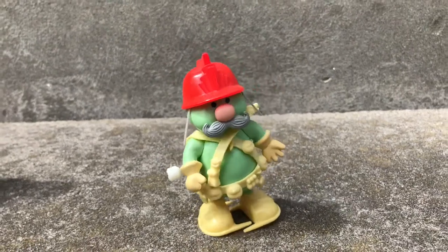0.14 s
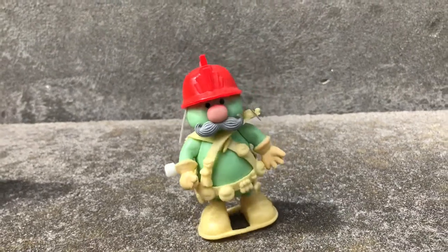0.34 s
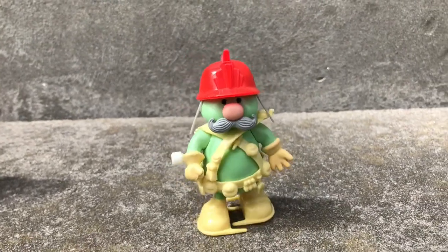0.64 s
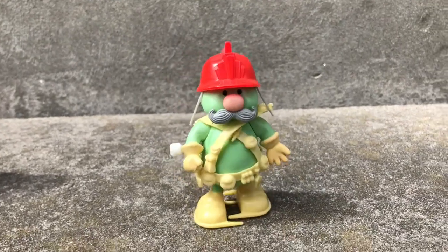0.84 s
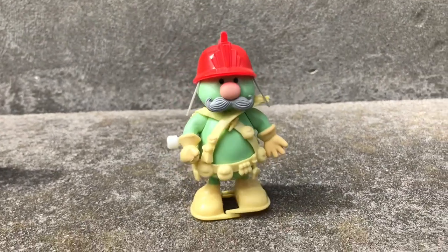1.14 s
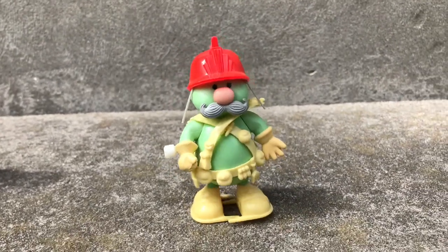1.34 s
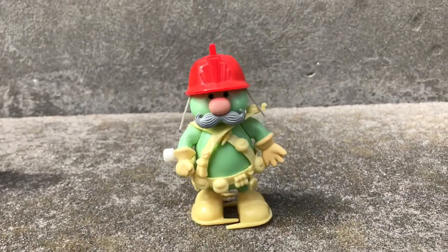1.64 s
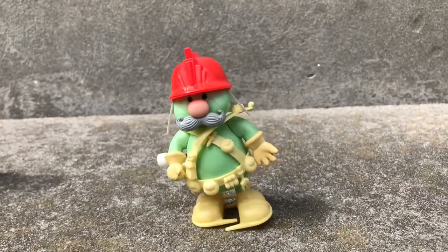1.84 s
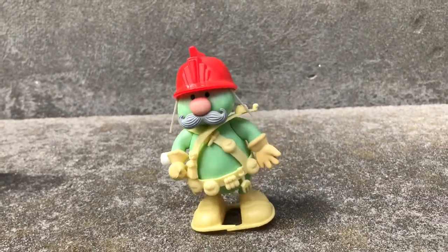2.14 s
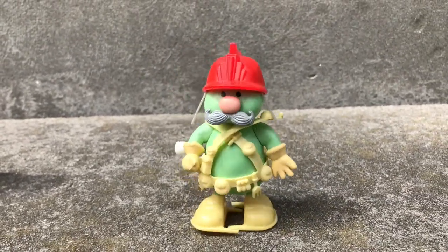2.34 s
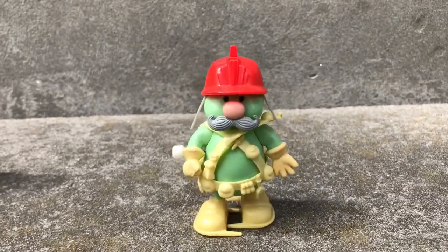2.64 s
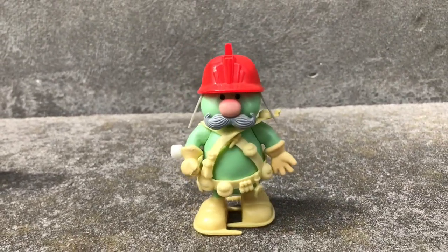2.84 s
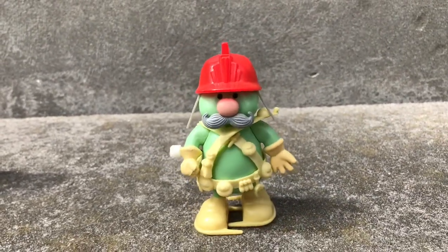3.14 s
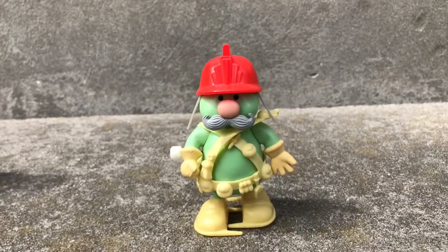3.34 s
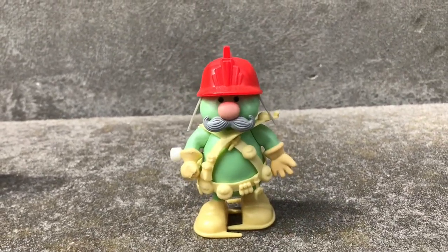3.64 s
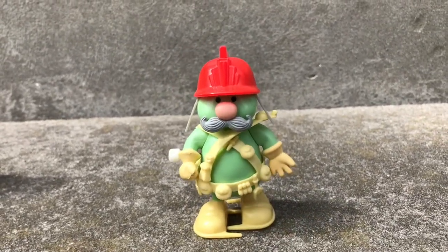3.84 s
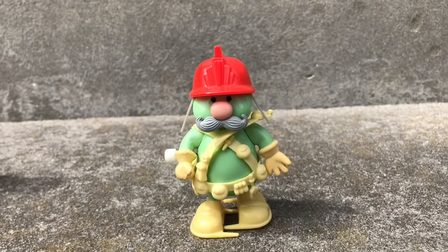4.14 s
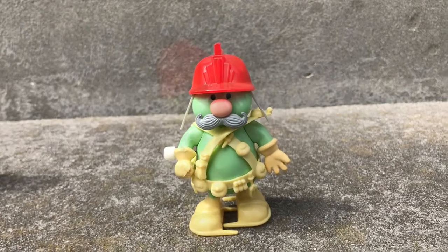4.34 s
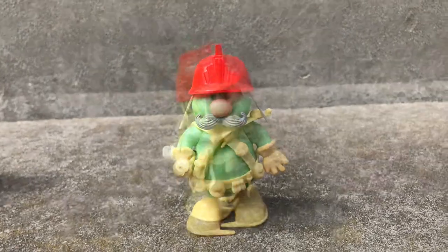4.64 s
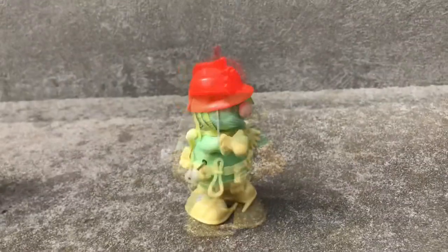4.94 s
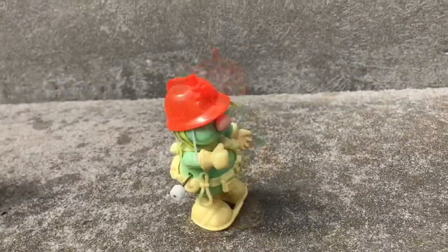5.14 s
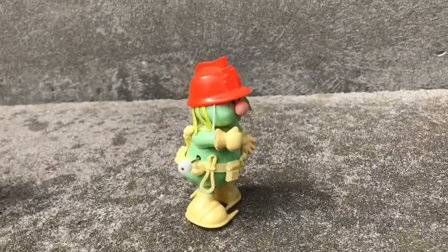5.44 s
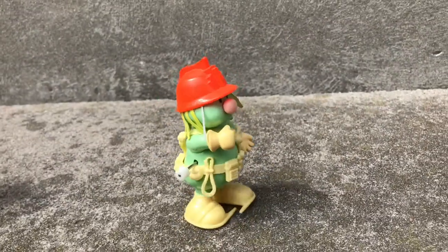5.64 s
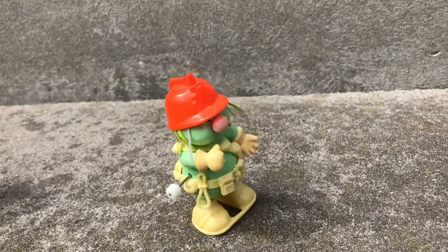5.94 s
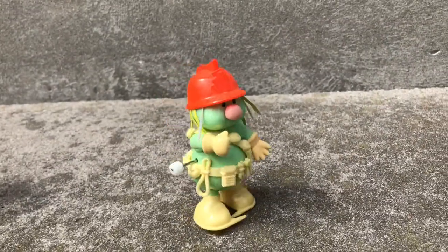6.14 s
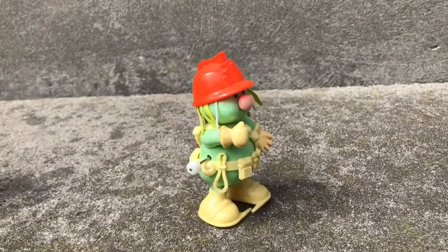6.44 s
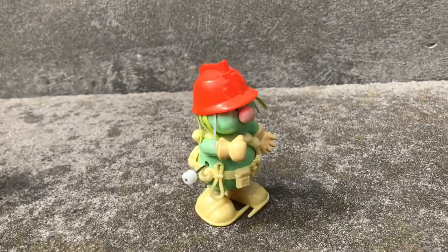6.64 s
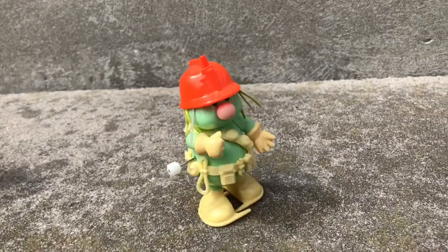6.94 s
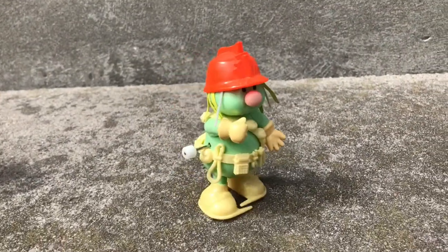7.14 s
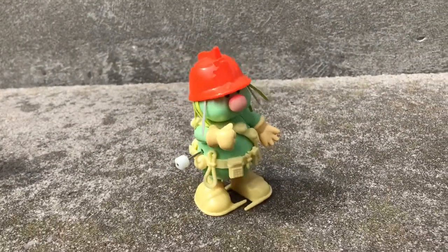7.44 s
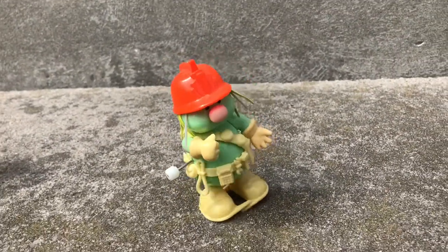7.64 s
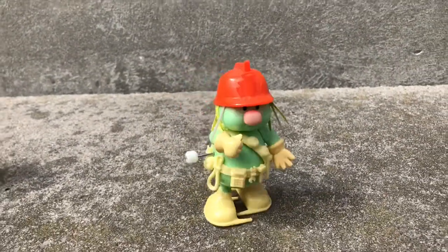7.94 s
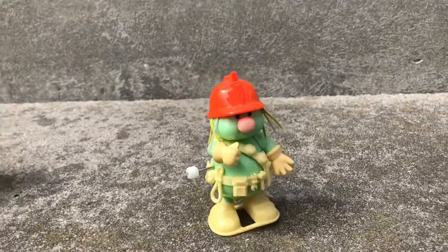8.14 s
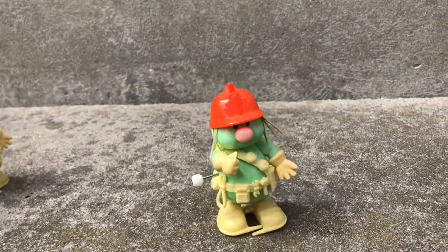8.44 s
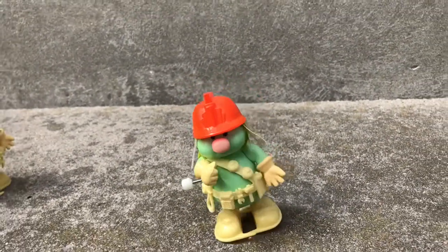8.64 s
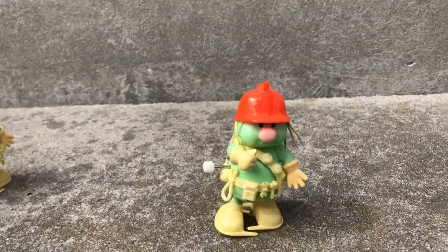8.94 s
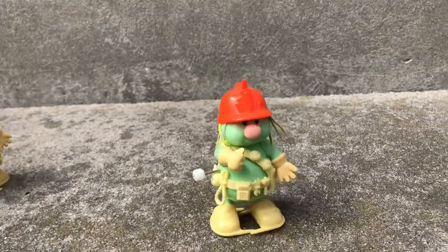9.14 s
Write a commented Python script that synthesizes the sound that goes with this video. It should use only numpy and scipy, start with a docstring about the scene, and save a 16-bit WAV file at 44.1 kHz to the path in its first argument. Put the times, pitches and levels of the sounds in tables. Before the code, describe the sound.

A small plastic wind-up toy walks on concrete outdoors, heard close up and in mono. From the start its gears give a high, ratcheting whir with a hollow rattle, labouring in short surges while the feet clack and scuff. It falters just before 1 second and again around 1.6 seconds, where the spring slips with a cluster of tiny pings. At about 2.7 seconds the mechanism stops, leaving a few very faint pings. A distant gull calls once at around 3 seconds. From about 4.3 seconds the whir fades back in, reaching a steady run just after 5 seconds. It pulses with roughly three strides a second, with sharp plastic clacks and gritty scrapes, the strongest knock near 6.8 seconds, and carries on to the end at a little over 9 seconds. A faint, low rumble of far traffic lies underneath throughout.

```python
"""The ratcheting whir of a plastic wind-up figure waddling on concrete, close up and in mono. Gear teeth tick
hundreds of times a second into its hollow shell. It labours in surges, stalls and stops; then the scene changes
and it fades in at a steady stride, side-on and slowly turning. Its feet clack and scuff, and the stalled spring
slips with tiny pings. A distant gull calls once over a town's far rumble."""
import sys
import numpy as np
from scipy import signal
from scipy.fft import rfft, irfft, next_fast_len
from scipy.io import wavfile
from scipy.ndimage import uniform_filter1d, map_coordinates

SR = 44100
rng = np.random.default_rng(int(sys.argv[2]) if len(sys.argv) > 2 else 0)


def output_pcm(signal):
    """Save a mono or channel-first signal as 16-bit PCM at the path in sys.argv[1].

    Samples are clipped to [-1, 1] before scaling.
    """
    pcm = np.clip(np.atleast_2d(signal).T, -1, 1) * 32767
    wavfile.write(sys.argv[1], SR, np.round(pcm).astype(np.int16))


N = 409248

# The gears break free, gather speed and are braked, one row per surge:
# start_s, brake_s, whir_at_brake_db, climb_db, treble_db
GEAR_SURGES = [(-.05, 0.101, -37.5, 1.5, -1.5), (.07, 0.245, -39.5, 3.5, -1),
               (.226, 0.416, -35.5, 1.5, 3.5), (0.371, .57, -39, -3, 7.5), (0.564, 0.678, -36, 4, 7.5),
               (.663, .874, -48.5, 3, 0), (0.915, .95, -61, -14, -1), (1.002, 1.158, -37.5, 12, -2),
               (1.164, 1.366, -31.5, 6, -1.3), (1.36, 1.525, -37.5, 8.5, -2), (1.531, 1.705, -68, -9, -2.5),
               (1.726, 1.94, -39.5, 6, -3.5), (1.979, 2.072, -43, -10, 3), (2.04, 2.119, -50.5, -1.5, 2.5),
               (2.105, 2.379, -40, 2, 3.5), (2.386, 2.515, -39, -1, 7), (2.541, 2.629, -49, 2.5, -1.4),
               (2.634, 2.671, -52, .5, -2.5)]
# Knocks of the feet and leg linkage: time_s, level_db, ring_hz
FOOT_KNOCKS = [(0.0956, -30.5, 4740), (0.19, -33.5, 4100), (0.2427, -33, 3950), (0.2782, -31.5, 4730),
               (0.786, -35, 3750), (1.3654, -30, 3800), (1.525, -31.5, 3660), (1.5894, -32.5, 3660),
               (1.604, -34.5, 3420), (1.9999, -34, 4400), (2.572, -35, 3870), (5.024, -36, 3900),
               (5.1641, -24, 4070), (5.3532, -33, 4150), (5.3915, -27, 4220), (5.4943, -27.5, 4670),
               (5.954, -31, 4390), (6.03, -30.5, 3253), (6.0524, -26.5, 5240), (6.2079, -30.5, 4390),
               (6.3418, -29, 4390), (6.5571, -28, 4180), (6.8421, -20.5, 4014), (7.0803, -27, 4430),
               (7.1288, -27, 4150), (7.6975, -28, 4045), (7.7239, -29.5, 4096), (8.6305, -24.5, 4380),
               (8.8601, -31, 4140), (9.0762, -28.5, 4150), (9.213, -26.5, 4050)]
WALK_START_S, WALK_FADE_S = 4.3, .95  # the steady walk fades in
CRUISE_DB = -35  # whir at cruising speed


def clockwork(jolt_cavity_db=-1):
    """The gears shake the shell into a high whir, a lower rattle and a hollow hum."""
    t = np.arange(N) / SR
    labour_db, walk_db = np.array([labouring(), walking()]) + .56 * wobble(28)
    whir, rattle = shell(gear_train(np.where(t < WALK_START_S, labour_db, walk_db)))
    cavity = below(rattle, edge_hz=3600)
    fade_in = np.clip((t - WALK_START_S) / WALK_FADE_S, 0, 1)
    whir_gain, rattle_gain, cavity_gain = np.zeros((3, N))
    gaits = (labour_db, -42, .55, -2, 1), (walk_db, -42.5, .36, -3.4, fade_in)
    for whir_db, rattle_cruise_db, swing, cavity_db, fader in gaits:
        # The rattle swings less than the whir and never tops it; the cavity follows both.
        rattle_db = np.minimum(rattle_cruise_db + swing * (whir_db - CRUISE_DB), whir_db)
        whir_gain += fader * amp(whir_db)
        rattle_gain += fader * amp(rattle_db)
        cavity_gain += fader * amp((whir_db + rattle_db) / 2 + cavity_db)
    jolt = jolts()
    walls = whir_gain * brightened(whir) + np.hypot(rattle_gain, jolt) * (rattle - cavity)
    return walls + np.hypot(cavity_gain, amp(jolt_cavity_db) * jolt) * cavity


def labouring(release_s=.0176, brake_db_per_s=540):
    """Level of the whir in dB while the weak spring moves the gears in surges."""
    t = np.arange(N) / SR
    level = np.full(N, -110.)
    for start, end, db, climb_db, _ in GEAR_SURGES:
        release = 1 - np.exp(-np.maximum(t - start, 0) / release_s)
        to_go = np.clip((end - t) / (end - start), 0, 1)
        brake_db = brake_db_per_s * np.maximum(t - end, 0)
        level = np.maximum(level, db + 20 * np.log10(release + 1e-9) - climb_db * to_go - brake_db)
    return level


def walking(last_stride_s=.29, check_s=.019):
    """Level of the whir in dB while each stride limps and each landing checks the gears."""
    # Strides of the steady walk: start_s, whir_db, limp_depth, landing_check_db
    strides = [(4.3, -36, .2, 2), (4.655, -34, 1.37, 0.3), (4.93, -35, .1, 3.5), (5.212, -35, .3, 3),
               (5.504, -34, 1.22, 0.3), (5.769, -34.5, 0.39, 2.5), (6.064, -34, .3, 1.4),
               (6.336, -33.5, 1.11, 0), (6.604, -34.5, 0.097, 1.65), (6.902, -34, 0.43, 4),
               (7.194, -31.5, 1.7, 2.5), (7.463, -34, 0.51, 4.5), (7.763, -33.5, 0.81, 3),
               (8.062, -32.5, 1.12, 1), (8.33, -34.5, .7, 5), (8.673, -33.5, .4, 1), (8.985, -34, 1.5, 2.5),
               (9.115, -32.5, 1.3, 0), (9.238, -36.5, 0.49, 0)]
    # A weak step, then a strong one: stride_fraction, whir_offset_db
    limp = [(0, -2.5), (.12, -2), (.25, .3), (.38, -0.99), (.55, 0.65), (.7, 1.13), (.84, 2.5), (1, -2.5)]
    t = np.arange(N) / SR
    start, db, depth, check_db = np.transpose(strides)
    walked = np.interp(t, np.append(start, start[-1] + last_stride_s), np.arange(len(start) + 1))
    stride = np.minimum(walked.astype(int), len(start) - 1)
    landing = np.minimum(np.round(walked).astype(int), len(start) - 1)
    limp_db = depth[stride] * np.interp(walked - stride, *np.transpose(limp))
    return db[stride] + limp_db - check_db[landing] * np.exp(-((t - start[landing]) / check_s) ** 2)


def gear_train(whir_db, cruise_teeth_per_s=590, doubling_db=9):
    """Two gear meshes tick faster as the whir grows louder."""
    rate = cruise_teeth_per_s * 2 ** ((whir_db - CRUISE_DB) / doubling_db)
    rate = np.maximum(rate, 20) * np.exp(.04 * wobble(60))
    main = teeth(rate, jitter=.08, scatter_db=1.5, t60=.0098, snap=.22)
    small = teeth(rate * 2.6, jitter=.25, scatter_db=-.5, t60=.0031, snap=.4)
    loose = .54 + rate / 1100  # the loose small gears join in more at speed
    flutter = amp(.75 * wobble(45) + .94 * wobble(170))
    return loose_parts((main + loose * small) / np.hypot(1, loose) * flutter)


def teeth(rate, jitter, scatter_db, t60, snap):
    """Each tooth lands with a snap, chatters for a moment, then slides until the next one."""
    passed = np.cumsum(rate) / SR
    timing, force = rng.standard_normal((int(passed[-1]), 2)).T
    hits = np.searchsorted(passed, np.arange(len(timing)) + jitter * timing).clip(0, N - 1)
    blows = np.bincount(hits, amp(scatter_db * force) / np.sqrt(rate[hits] + 200), N)
    t = np.arange(SR // 30) / SR
    energy = signal.fftconvolve(blows ** 2, amp(-120 * t / t60))[:N]
    chatter, slide = unit(np.sqrt(np.abs(energy))), .33
    return unit(np.hypot(chatter, slide) * rng.standard_normal(N) + snap * unit(blows))


def loose_parts(drive, depth_db=2.2):
    """Narrow resonances come and go as the loose parts shift against each other."""
    spectrum = signal.stft(drive, nperseg=512)[2]
    patches = rng.standard_normal(spectrum.shape)
    for _ in range(2):
        patches = uniform_filter1d(uniform_filter1d(patches, size=3, axis=0), size=17, axis=1)
    return signal.istft(spectrum * amp(depth_db * unit(patches)), nperseg=512)[1][:N]


def shell(drive, split_hz=7500):
    """The shell colours the ticks by the side it shows: whir above the split, rattle below."""
    # Shell resonances: centre_hz, width_hz, front_db, side_db, half_turned_db
    resonances = [(943, 120, -21, -8, -12), (1160, 1140, -31, -19.5, -22.5),
                  (1930, 2100, -22.5, -47, -22.5), (2376, 336, -18, -7.5, -13),
                  (2760, 350, -24, -17, -16.5), (3220, 680, -26, -12.5, -15),
                  (3770, 890, -16.5, -15.5, -15.5), (4150, 260, -26, -9.5, -10.5),
                  (4513, 510, -11, -9, -9.5), (5150, 810, -13.5, -7, -9.5), (5770, 850, -8, -6, -3.5),
                  (6320, 590, -8, -13, -15.5), (6770, 350, -9.5, -6, -6), (7170, 270, -11.5, -9, -5.5),
                  (8770, 3200, -19, -5, -19), (8827, 1230, -2.5, -4.5, 3), (9800, 670, -26, -5, -2.5),
                  (11600, 2650, -11, -6.5, -6.5), (12260, 2800, -15.5, -10.5, -6),
                  (12400, 2100, -5, -6.5, -4), (13800, 870, -11.5, -2, 2.5), (15700, 3100, -7, -1, 1.5)]
    # How the figure faces the listener: time_s, front_share, side_share, half_turned_share
    facing = [(2.8, 1, 0, 0), (4.2, 0, 1, 0), (6.7, 0, 1, 0), (7.7, 0, 0, 1)]
    hz = np.fft.rfftfreq(8192, 1 / SR)
    modes = np.array(resonances)
    colours = np.sqrt(amp(modes[:, 2:]).T ** 2 @ bell(hz, modes[:, :1], modes[:, 1:2]) ** 2)
    whir, rattle = np.zeros((2, N))
    for share, colour in zip(curves(facing), colours):
        ringing = filtered(drive, lambda f: np.interp(f, hz, colour))
        low = below(ringing, split_hz)
        whir += share * unit(ringing - low)
        rattle += share * unit(low)
    return whir, rattle


def brightened(whir, treble_hz=11300):
    """The top treble of the whir is brighter in some surges than in others."""
    start, end, _, _, treble_db = np.transpose(GEAR_SURGES)
    tilt = amp(np.interp(np.arange(N) / SR, (start + end) / 2, treble_db - treble_db.mean(), right=0))
    low = below(whir, treble_hz)
    return (low + tilt * (whir - low)) / np.sqrt((1 + tilt ** 2) / 2)


def jolts(trim_db=-15.5, swell_s=.0074):
    """Envelope of the short rattle that each knock shakes out of the shell."""
    out, t = np.zeros(N), np.arange(SR // 5) / SR
    for s, db, _ in FOOT_KNOCKS:
        add(out, s - swell_s / 2, amp(db + trim_db) * t / swell_s * np.exp(1 - t / swell_s))
    return out


def feet(trim_db=-5, width_hz=650, grit_db=-21, body_db=-17, bounce_db=6, swell_s=.0021):
    """A foot bounces on concrete: a quick cluster of ringing plastic clacks with grit and body."""
    out, t = np.zeros(N), np.arange(SR // 5) / SR
    envelope = t / swell_s * np.exp(1 - t / swell_s)
    envelope_rms = np.sqrt(np.mean(envelope ** 2))
    for s, db, ring_hz in contacts():
        clack = burst(lambda hz: bell(hz, ring_hz, width_hz)
                      + amp(grit_db) * bell(hz, 6000, 9000)
                      + amp(body_db) * bell(hz, 944, 300))
        bounces = amp(-bounce_db * (t * rng.uniform(180, 320) % 1))  # each starts hard and dies away
        add(out, s, amp(db + trim_db) * envelope_rms * unit(clack * envelope * bounces))
    return out


def contacts(rock_s=.011, rock_db=-10, taps_per_s=7, tap_db=-37, tap_hz=4200):
    """A foot knocks, rocks and touches again; the slack linkage taps at random in the steady walk."""
    knocks = np.array(FOOT_KNOCKS)
    touches = knocks + [rock_s, rock_db, 0] + rng.standard_normal(knocks.shape) * [rock_s / 4, 2, 250]
    steady_s = WALK_START_S + WALK_FADE_S
    count = int(taps_per_s * (N / SR - steady_s))
    taps = [steady_s, tap_db, tap_hz] + rng.standard_normal((count, 3)) * [.5 / taps_per_s, 2, 550]
    taps[:, 0] += np.arange(count) / taps_per_s
    return np.vstack([knocks, touches, taps])


def soles(trim_db=-5, grit_db=3.5, width_hz=280, edge_s=.022):
    """The soles stick and slip on grit; their ring glides as the weight rolls from foot to foot."""
    # A sole sliding on concrete: start_s, length_s, first_ring_hz, last_ring_hz, level_db
    scuffs = [(0, 0.12, 3950, 3930, -44), (0.559, 0.17, 4310, 4200, -46.5), (1.029, 0.19, 3720, 3780, -48),
              (1.246, 0.16, 3830, 3900, -41.5), (1.375, 0.13, 4160, 4340, -44),
              (1.408, .12, 3720, 3700, -44), (1.733, .24, 4224, 4530, -46.5), (1.99, .39, 4520, 4556, -55),
              (4.533, .1, 4130, 4310, -47), (4.692, 0.26, 3260, 3600, -48),
              (4.935, 0.11, 4100, 4060, -44.5), (5.298, 0.14, 4130, 4100, -43.5),
              (5.477, 0.21, 4920, 4630, -43), (5.711, 0.23, 4086, 4413, -44),
              (6.17, .13, 4136, 4380, -41.5), (6.622, 0.074, 4014, 4020, -38.5),
              (6.944, 0.26, 4630, 4230, -40.5), (7.177, 0.12, 4535, 4550, -45),
              (7.87, 0.19, 3893, 4170, -42.5), (8.14, 0.2, 3723, 3574, -44.5),
              (8.558, 0.096, 4300, 4320, -47), (8.85, 0.075, 4165, 4100, -39)]
    out, t = np.zeros(N), np.arange(N) / SR
    friction = unit((wobble(2 * width_hz) + 1j * wobble(2 * width_hz)) * amp(grit_db * wobble(200)))
    for start, length, first_hz, last_hz, db in scuffs:
        sliding = (t >= start) & (t < start + length)
        age = t[sliding] - start
        weight = np.sqrt(np.clip(np.minimum(age, length - age) / edge_s, 0, 1))
        phase = 2 * np.pi * np.cumsum(first_hz + (last_hz - first_hz) * age / length) / SR
        ring = unit(np.real(friction[sliding] * np.exp(1j * phase)))
        out[sliding] += amp(db + trim_db) * weight * ring
    return out


def spring(trim_db=-7, t60=.0452, attack_s=.001):
    """Coils of the stalled steel spring slip with a tiny gritty ping."""
    # Slips of the coils: time_s, level_db
    slips = [(0.9231, -41.5), (1.5515, -50), (1.5741, -36.5), (1.5988, -33), (1.6207, -37), (1.6384, -30.5),
             (1.6605, -40), (1.712, -35.5), (1.7258, -41), (2.761, -54), (2.8653, -48.5), (2.8775, -49.5),
             (3.5627, -55)]
    # Spring resonances: centre_hz, width_hz, level_db
    modes = [(3970, 530, 4), (5900, 290, 8), (6650, 190, 10), (7100, 230, -15), (6013, 30000, -13)]
    out, t = np.zeros(N), np.arange(SR // 5) / SR
    envelope = amp(-60 * t / t60) * (1 - np.exp(-t / attack_s))
    for s, db in slips:
        ping = burst(lambda hz: sum(amp(level + 2 * rng.standard_normal()) * bell(hz, centre, width)
                                    for centre, width, level in modes))
        add(out, s, amp(db + trim_db) * ping * envelope)
    return out


def gull(octave_db=-13, fifth_db=-29, crack_hz=440, upper_side_db=-9, echo_db=-12, echo_t60=.5):
    """A far cry rises, cracks into side tones, then holds a clean falling note; walls smear it."""
    # Contour of the call: time_s, pitch_hz, level_db, roughness (0-1)
    call = [(2.86, 1950, -88, .16), (2.9, 2090, -69, .16), (2.94, 2330, -68, .16), (2.955, 2330, -59.5, 1),
            (2.98, 2310, -60, 1), (2.995, 2227, -57.5, 0.03), (3.05, 2210, -56, 0), (3.13, 2180, -66, 0),
            (3.19, 2080, -66, 0), (3.23, 2030, -85, 0)]
    pitch, db, rough = curves(call)
    phase = 2 * np.pi * np.cumsum(pitch * (1 + .0022 * wobble(90))) / SR + .65 * rough * wobble(250)
    crack = 2 * np.pi * crack_hz * np.arange(N) / SR + wobble(120)
    sides = np.sin(phase - crack) + amp(upper_side_db) * np.sin(phase + crack)
    overtones = amp(octave_db) * np.sin(2 * phase) + amp(fifth_db) * np.sin(1.5 * phase)
    clean = np.clip(1 - 8 * rough, 0, 1)
    cry = unit(np.sin(phase) + rough * sides + clean * overtones)
    cry *= amp(db) * during(call) / np.hypot(1, rough)
    t = np.arange(SR // 2) / SR
    tail = rng.standard_normal(len(t)) * amp(-60 * t / echo_t60)
    return cry + amp(echo_db) * signal.fftconvolve(cry, tail / np.linalg.norm(tail))[:N]


def town(level_db=-51, dip_s=4.76, dip_width_s=.36, dip_db=-4):
    """Far traffic: rumble, engine drone and the hush of tyres. The level dips briefly."""
    # Spectrum of the rumble: frequency_hz, relative_db
    spectrum = [(15, -45), (25, -6.5), (69, 1.5), (133, -9.5), (178, -13.5), (221, -10), (253, -16),
                (281, -17.5), (567, -27), (1110, -20.5), (2630, -39.5), (4870, -46.5), (5880, -47),
                (6380, -49), (15500, -51.5)]
    # Narrow bands of traffic noise: centre_hz, width_hz, relative_db
    bands = [(227.7, 14, -17), (914, 250, -18.5), (1680, 900, -24)]
    points_hz, points_db = np.transpose(spectrum)
    rumble = noise(lambda hz: amp(np.interp(np.log(hz + 1), np.log(points_hz), points_db)))
    hums = sum(amp(db) * noise(lambda hz: bell(hz, centre, width)) for centre, width, db in bands)
    dip = np.exp(-((np.arange(N) / SR - dip_s) / dip_width_s) ** 2)
    return amp(level_db + dip_db * dip) * (rumble + hums)


def amp(db):
    """Decibels to gain."""
    return 10 ** (np.asarray(db) / 20)


def unit(x):
    """Scale to rms 1."""
    return x / np.sqrt(np.mean(np.abs(x) ** 2) + 1e-20)


def curves(rows):
    """One value per sample for each column after the time."""
    s, *columns = np.transpose(rows)
    return [np.interp(np.arange(N) / SR, s, column) for column in columns]


def during(rows):
    """A soft-edged gate, open while a table lasts."""
    t = np.arange(N) / SR
    return uniform_filter1d(1. * ((t >= rows[0][0] - .02) & (t <= rows[-1][0])), size=300)


def wobble(rate):
    """A smooth random curve, rate knots a second."""
    return map_coordinates(rng.standard_normal(int(N * rate / SR) + 4), [np.arange(N) * rate / SR])


def bell(hz, centre, width):
    """Gain of a resonance with steep skirts."""
    return 1 / (1 + ((hz * hz - centre * centre) / ((hz + 1) * width)) ** 2)


def filtered(x, gain):
    """Minimum-phase EQ with this gain against frequency."""
    size = 2 * next_fast_len(N // 2 + 4096)
    cepstrum = irfft(np.log(np.maximum(gain(np.fft.rfftfreq(size, 1 / SR)), 1e-6)), size)
    cepstrum[1:size // 2] *= 2
    cepstrum[size // 2 + 1:] = 0
    return irfft(rfft(x, size) * np.exp(rfft(cepstrum)), size)[:N]


def below(x, edge_hz):
    """Steep zero-phase low-pass."""
    return signal.sosfiltfilt(signal.butter(6, edge_hz, fs=SR, output="sos"), x)


def noise(colour):
    """A full-length bed of coloured noise, rms 1."""
    return unit(filtered(rng.standard_normal(N), colour))


def burst(colour):
    """A fifth of a second of coloured noise, rms 1."""
    size = SR // 5
    return unit(irfft(rfft(rng.standard_normal(size)) * colour(np.fft.rfftfreq(size, 1 / SR)), size))


def add(track, s, sound):
    """Mix a sound in at s seconds."""
    i = max(round(s * SR), 0)
    track[i:i + len(sound)] += sound[:max(N - i, 0)]


def scene():
    """The figure up close, gull and town behind it, alike in both ears."""
    mono = clockwork() + soles() + feet() + spring() + gull() + town()
    return np.array([mono, mono])


def record(dry, low_cut_hz=37, high_cut_hz=15850):
    """Steep filters cut the deepest rumble and the very top of the treble."""
    size = next_fast_len(N + 8192)
    hz = np.fft.rfftfreq(size, 1 / SR)
    low_cut = 1 / np.sqrt(1 + (low_cut_hz / (hz + 1)) ** 10)
    high_cut = .5 - .5 * np.tanh((hz - high_cut_hz) / 50)
    return irfft(rfft(dry, size) * low_cut * high_cut, size)[:, :N]


dry = scene()
out = record(dry)
output_pcm(out)
```